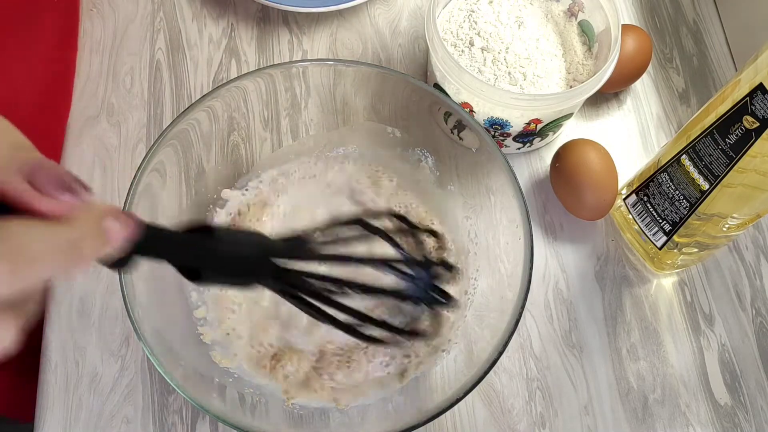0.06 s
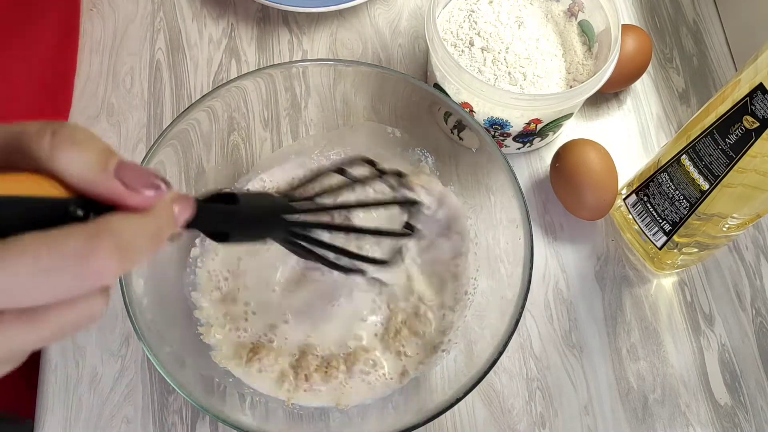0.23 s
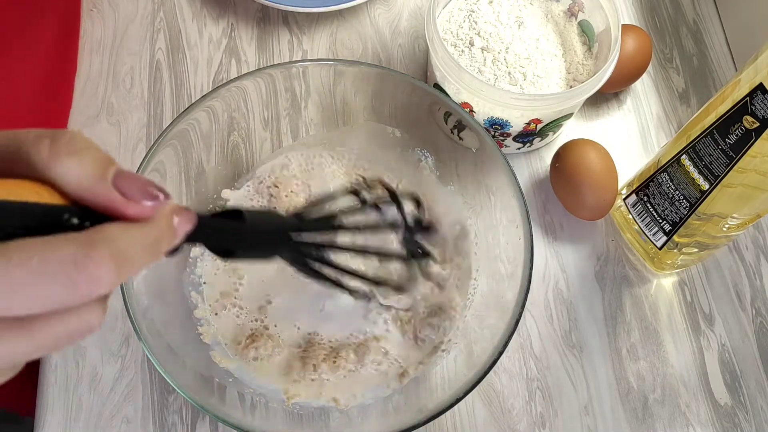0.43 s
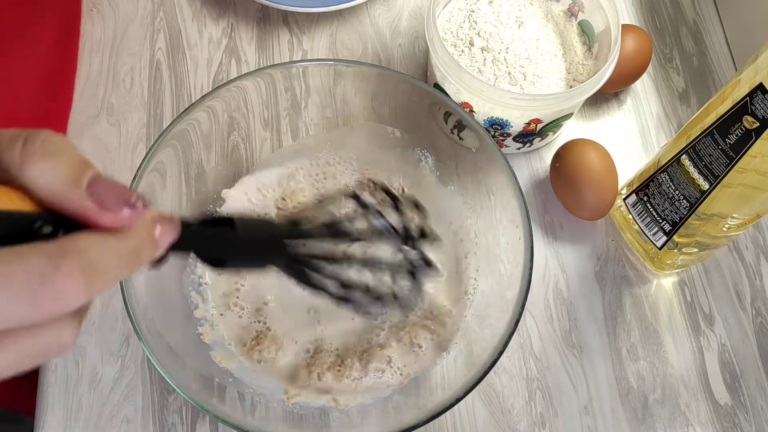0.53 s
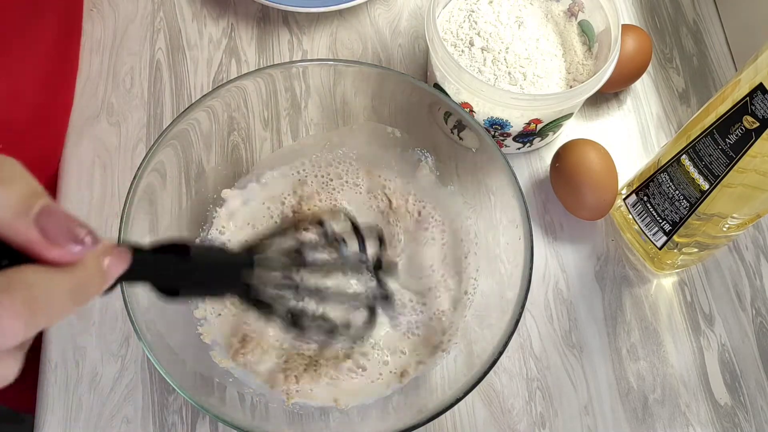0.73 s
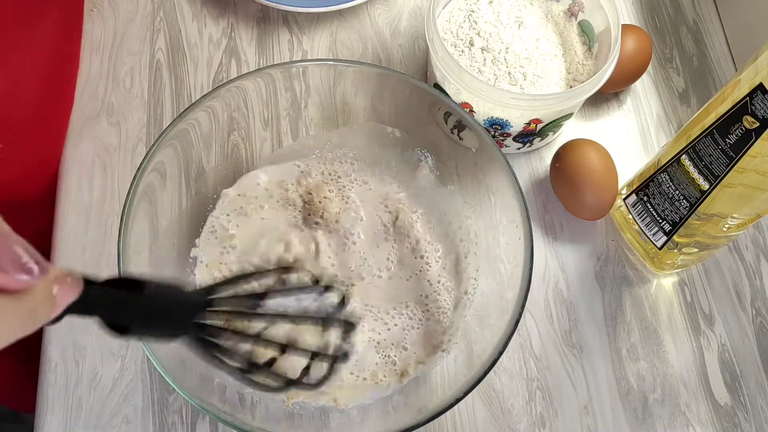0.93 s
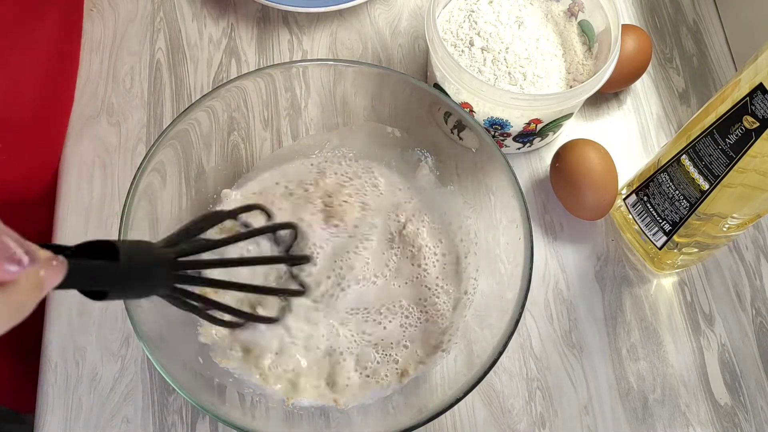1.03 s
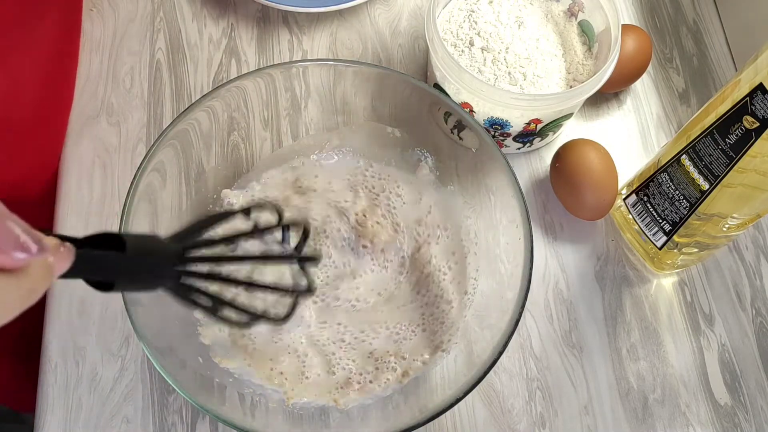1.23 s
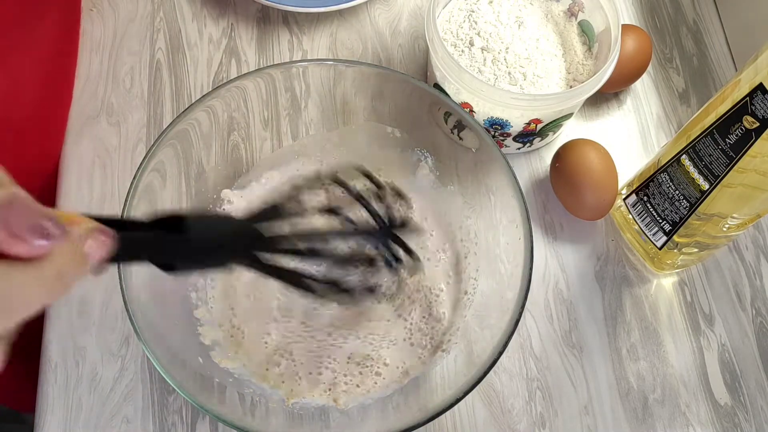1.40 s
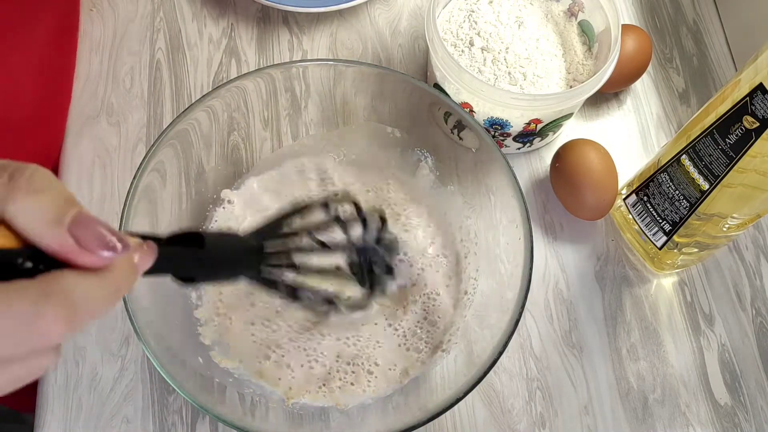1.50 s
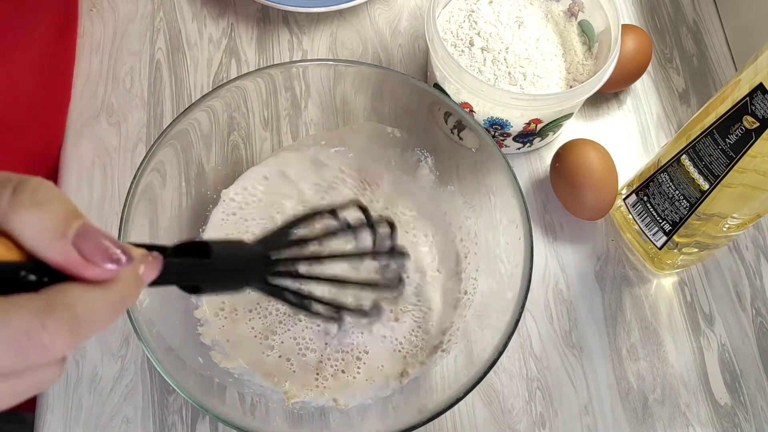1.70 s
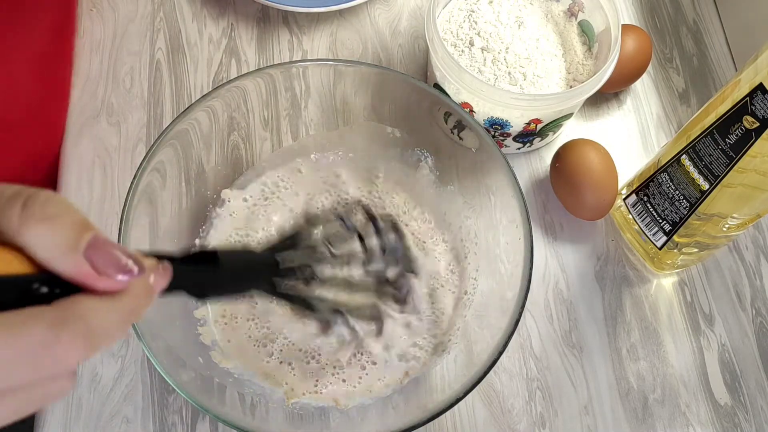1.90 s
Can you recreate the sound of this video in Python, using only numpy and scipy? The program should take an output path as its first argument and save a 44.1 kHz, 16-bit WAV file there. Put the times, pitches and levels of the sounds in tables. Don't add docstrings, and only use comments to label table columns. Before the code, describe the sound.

Whisk wires slap and clink against a glass bowl, about six quick strokes a second

```python
import sys
import numpy as np
from scipy import signal
from scipy.io import wavfile
from scipy.ndimage import uniform_filter1d

SR = 44100
rng = np.random.default_rng(int(sys.argv[2]) if len(sys.argv) > 2 else 0)


def wrap_up_sound(samples):
    columns = np.atleast_2d(samples).T
    tamed = np.clip(columns, -1, 1)
    steps = np.round(tamed * 32767).astype(np.int16)
    wavfile.write(sys.argv[1], SR, steps)


def gain_from_db(level_db):
    decades = np.asarray(level_db, float) / 20
    return 10 ** decades


N = 85995
TIME = np.arange(N) / SR

# start in seconds, levels in dB of the crack, the table thump,
# the lower bowl tone and the upper bowl tone.
STROKES = [(0.2117, -14.5, -34.5, -51, -47), (.2405, -26, -48, -41.5, -45), (0.2586, -21, -49, -43.5, -79),
           (0.4423, -11.5, -30, -35, -33), (0.632, -14, -29, -21, -31), (0.8045, -6.5, -27.5, -56, -36),
           (.972, -6, -33, -47, -34.5), (1.125, -8, -32, -46, -42), (1.284, -10.5, -34.5, -46, -45.5),
           (1.521, -14.5, -33.5, -39.5, -51), (1.5762, -26.5, -51, -34.5, -46.5)]
# pitch in Hz, level in dB under the crack,
# time the wires take to land in seconds, level of the deep bowl tone in dB.
WIRE_LOOPS = [(3400, -24, 0.0015, -0.5), (2940, -7, 0.00074, -16), (3400, -2.5, 0.0002, -21),
              (1930, -32, 0.0014, 4), (4950, -3, 0.0034, -0.5), (3260, -23, 0.0029, -11),
              (4740, -34, 0.00093, 3.5), (3140, -17, 0.0034, 1), (3750, -1, 0.00082, 1.5),
              (3500, -11.5, 0.0027, -1.3), (3530, -32, 0.0016, -6)]
STROKE_S = np.array(STROKES)[:, 0]
LIGHT_LAG = 1


def rms_one(x):
    return x / np.sqrt(np.mean(x ** 2) + 1e-20)


def at_hz(points, hz):
    table_hz, values = np.array(points).T
    return np.interp(np.log(hz), np.log(table_hz), values)


def band_pass(low_hz, high_hz):
    return signal.butter(2, [low_hz, high_hz], "band", fs=SR, output="sos")


def bands(low_hz, count):
    edges = np.geomspace(low_hz, 18000, count + 1)
    return [(np.sqrt(a * b), band_pass(a, b)) for a, b in zip(edges, edges[1:])]


def drift(rate_hz):
    r = np.exp(-80 * np.pi * rate_hz / SR)
    noise = rng.standard_normal(N // 40 + 2002)
    slow = signal.lfilter([1], [1, -2 * r, r * r], noise)[2000:]
    return np.interp(np.arange(N) / 40, np.arange(len(slow)), rms_one(slow))


def ring(clicks, hz, t60):
    r, w = gain_from_db(-60 / (t60 * SR)), 2 * np.pi * hz / SR
    return signal.lfilter([0, np.sin(w)], [1, -2 * r * np.cos(w), r * r], clicks + 1e-18)


def delay_left(x, lag):
    return np.array([x[0][np.maximum(np.arange(N) - lag, 0)], x[1]])


def floor():
    # frequency in Hz, density in dB per Hz.
    floor_colour = [(15, -2), (25, 5), (126, 1.5), (458, -11), (1210, -18), (1380, -15.5), (6240, -20.5),
                    (8400, -23.5), (15600, -30)]
    # frequency in Hz, left-right likeness as a share.
    likeness = [(60, 0.45), (180, 0.92), (550, 0.31), (1650, -0.44), (4970, 0.059), (15000, -0.18)]
    out, white = 0, rng.standard_normal((2, 2, N))
    for k, (hz, sos) in enumerate(bands(19.2, count=20)):
        mid, side = signal.sosfilt(sos, white[k % 2])
        alike = np.clip(at_hz(likeness, hz), -1, 1)
        pair = np.sqrt(1 + alike) * mid + np.sqrt(1 - alike) * side * [[1], [-1]]
        out = out + gain_from_db(at_hz(floor_colour, hz) + 1.52 * drift(3.6)) * pair
    top_cut = signal.cheby2(8, 30, 16400, fs=SR, output="sos")
    return signal.sosfilt(top_cut, gain_from_db(-47.5) * rms_one(out))


def kitchen(x):
    # frequency in Hz, decay time t60 in seconds.
    room_t60 = [(200, 0.56), (560, 0.43), (1470, 0.28), (3880, 0.21), (10200, 0.15)]
    room_db, rise_s, echo_s, echo_db = -5.5, 0.0014, 0.0082, -12.5
    t = np.arange(SR // 2) / SR
    white = rng.standard_normal((2, 2, len(t)))
    tail = 0
    for k, (hz, sos) in enumerate(bands(163.7, count=14)):
        tail = tail + signal.sosfilt(sos, white[k % 2]) * gain_from_db(-60 * t / at_hz(room_t60, hz))
    tail = tail * (1 - np.exp(-(t / rise_s) ** 2))
    tail = gain_from_db(room_db) * tail / np.sqrt(np.sum(tail ** 2) / 2)
    tail[:, int(echo_s * SR)] += gain_from_db(echo_db)
    return signal.fftconvolve(x, tail, axes=1)[:, :N]


def slosh():
    # time in seconds, level in dB.
    stir = [(0.0, -61), (0.298, -49), (0.374, -53), (0.738, -56.5), (1.012, -56.5), (1.156, -44.5),
            (1.314, -65), (1.824, -60.5), (1.95, -77)]
    bubbles_per_s, bubble_cycles, bubbles_db, lap_db = 180, 2.3, -11, -1.5
    stir_s, stir_db = np.transpose(stir)
    vigour = gain_from_db(np.interp(TIME, stir_s, stir_db))
    sizes = gain_from_db(4.9 * np.minimum(rng.exponential(1, N), 4)) * rng.choice([-1, 1], N)
    born = rng.random(N) < bubbles_per_s * gain_from_db(5 * drift(8)) / SR
    dealt, side = rng.integers(0, 16, N), rng.uniform(0.076, 1, (2, N))
    pops = 0
    for k, hz in enumerate(np.geomspace(400, 6000, 16)):
        pops = pops + ring(side * sizes * born * (dealt == k), hz, bubble_cycles / hz)
    pops = rms_one(signal.lfilter([1], [1, -0.8], pops))
    lap = ring(rng.standard_normal(N), 105, 0.063) + 0.3 * ring(rng.standard_normal(N), 212, 0.047)
    return vigour * (gain_from_db(bubbles_db) * pops + gain_from_db(lap_db + 4.1 * drift(3.0)) * rms_one(lap))


def rustle():
    # time in seconds, level in dB, centre in Hz, length in seconds.
    rustles = [(0.42, -52.5, 4560, 0.0078), (.556, -50.5, 3000, 0.0054), (0.934, -50.5, 1720, 0.0091),
               (1.094, -47, 1410, 0.019), (1.485, -51, 4500, 0.0086), (1.648, -52, 3000, 0.013),
               (1.77, -56.5, 2480, .03), (1.887, -51.5, 2190, .03), (1.008, -42.5, 3630, 0.028),
               (1.158, -41.5, 3520, 0.026)]
    out = 0
    grains = rng.standard_normal((2, N)) * rng.standard_normal((2, N)) ** 2
    for s, db, hz, length in rustles:
        octave = signal.sosfilt(band_pass(hz / np.sqrt(2), hz * np.sqrt(2)), grains + grains[0])
        out = out + gain_from_db(db) * rms_one(octave) * np.exp(-((TIME - s) / length) ** 2)
    return out


def ticks():
    # start in seconds, peak in dB, pitch in Hz, length in cycles.
    light_ticks = [(0.159, -36.5, 6530, 13), (0.1638, -27, 3370, 4.5), (0.2597, -14.5, 3400, 9.7),
                   (0.4122, -46, 5270, 25), (0.5537, -41.5, 997, 16.5), (.7224, -36, 4400, 4.5),
                   (0.259, -31, 7900, 10), (.787, -46.5, 3140, 31), (0.798, -37, 3020, 13),
                   (0.928, -42, 1650, 4.3), (1.0878, -37.5, 3240, 14), (1.3663, -38.5, 6300, 30),
                   (1.4492, -39.5, 8000, 5.4), (1.4746, -41.5, 3400, 7.4), (1.4807, -48.5, 5100, 33),
                   (1.6379, -29, 3780, 2.8), (1.577, -25.5, 890, 6.5), (1.7079, -37, 1320, 5.7),
                   (1.716, -33.5, 3750, 4.5), (1.7644, -32, 4100, 1.7), (1.604, -36, 840, 26),
                   (1.855, -34.5, 2360, 3.6), (1.8712, -31.5, 3224, 31), (1.8994, -44.5, 3200, 24),
                   (1.94, -41, 2160, 12)]
    tick_db, snap_db, roughness = 3.5, -14.5, 0.33
    out, t = np.zeros((2, N + SR)), np.arange(1800) / SR
    for s, db, hz, cycles in light_ticks:
        noise = rng.standard_normal((3, 1800))
        grain = 1 + roughness * rms_one(uniform_filter1d(noise[2], size=int(3 * SR / hz)))
        tone = np.sin(2 * np.pi * hz * t) * gain_from_db(-30 * t * hz / cycles) * grain * np.tanh(t * hz)
        snap_band = band_pass(hz / 4.6, min(hz * 1.8, 10000))
        snap = signal.sosfilt(snap_band, noise[:2] * np.exp(-t / 0.0022))
        start = int(s * SR)
        out[:, start:start + 1800] += gain_from_db(db + tick_db) * (tone + gain_from_db(snap_db) * 2 * snap)
    return delay_left(out[:, :N], LIGHT_LAG)


def lingering():
    # start in seconds, peak in dB, pitch in Hz, decay time t60 in seconds.
    tones = [(.2130, -37, 2065, 0.11), (.2410, -27, 3050, 0.021), (.2432, -31.5, 2545, 0.043),
             (.2520, -26.5, 2980, 0.036), (.2990, -41, 1920, 0.046), (.3050, -45, 3400, 0.028),
             (.4440, -32.5, 2045, 0.082), (.4430, -22, 4150, 0.024), (.5900, -47, 987, 0.035),
             (.6330, -20, 3315, 0.02), (.6340, -32, 4830, 0.086), (.8070, -27.5, 1314, 0.14),
             (.8120, -31, 895, 0.14), (.8070, -30.5, 1459, 0.11), (.8100, -38.5, 2176, 0.16),
             (.8050, -21.5, 3150, 0.031), (.8060, -32.5, 4800, 0.027), (.9810, -31, 4790, .05),
             (.9800, -36, 3130, .07), (.9830, -32, 1397, 0.12), (1.0280, -38.5, 836, 0.054),
             (1.1260, -23, 1290, 0.079), (1.1300, -26.5, 1143, 0.065), (1.1230, -23.5, 5640, 0.028),
             (1.1330, -23.5, 8530, 0.011), (1.1550, -36, 2696, 0.065), (1.1630, -34, 1265, .08),
             (1.1400, -39.5, 834, 0.22), (1.2845, -22, 3830, 0.021), (1.2845, -17.5, 6030, 0.027),
             (1.2880, -35.5, 3560, 0.1), (1.3000, -41.5, 3835, 0.25), (1.2850, -30, 1150, 0.031),
             (1.2980, -38, 823, 0.19), (1.2930, -42.5, 6288, 0.13), (1.5220, -37, 1410, 0.034),
             (1.6380, -39.5, 1130, 0.044), (1.6650, -45, 1440, 0.036), (1.7170, -47.5, 1290, 0.048),
             (1.7390, -49, 2970, 0.027), (1.7600, -44.5, 3130, .02), (1.8104, -45, 2900, .03),
             (1.8110, -49, 1450, 0.027), (.9740, -27.5, 430, 0.095), (1.1270, -33, 406.5, 0.23),
             (1.1320, -34.5, 507.6, 0.11)]
    roughness, rise_s = 0.78, 0.0011
    out, t = np.zeros((2, N + SR)), np.arange(8000) / SR
    for s, db, hz, t60 in tones:
        noise = rng.standard_normal((3, 8000))
        smooth = uniform_filter1d(noise[0] + noise[1:], size=80)
        flutter = rms_one(uniform_filter1d(smooth, size=80))
        tone = np.sin(2 * np.pi * hz * t) * gain_from_db(db - 60 * t / t60) * np.tanh(t / rise_s)
        start = int(s * SR)
        out[:, start:start + 8000] += tone * (1 + roughness * np.tanh(hz / 1800) * flutter)
    return delay_left(out[:, :N], LIGHT_LAG)


def struck(modes, column, gain_db):
    rebound, rebound_s, chance_db = 0.43, 0.006, 2.5
    out, rows = np.zeros((2, N)), np.array(STROKES)
    chance = rng.standard_normal((len(rows), len(modes), 3))
    for k, (hz, level_db, t60, *pan_db) in enumerate(modes):
        clicks = np.zeros((2, N))
        for late in (0, 1):
            wait = late * rebound_s * (1 + 0.321 * np.tanh(chance[:, k, 2]))
            at = ((STROKE_S + wait) * SR).astype(int)
            clicks[late, at] = gain_from_db(rows[:, column] + gain_db + level_db + chance_db * chance[:, k, late])
        tone = ring(clicks[0] + rebound * clicks[1], hz, t60)
        if pan_db:
            tone = (-1) ** k * tone
            turn = int(SR / hz * min(hz / 5000, 0.25))
            out += np.array([tone, np.roll(tone, turn)]) * gain_from_db([[pan_db[0] / 2], [-pan_db[0] / 2]])
        else:
            out += tone * gain_from_db([[1.3], [-1.3]])
    push = np.hanning(41)[::2] ** 2
    return signal.lfilter(push / push.sum(), 1, out)


def table_thump():
    # frequency in Hz, level in dB, decay time t60 in seconds.
    table_modes = [(114.3, -12, 0.49), (131.2, -3, 0.1), (136, -12, 0.13), (221, -6, 0.08),
                   (290, -10, 0.054)]
    low_cut = signal.butter(2, 137, "high", fs=SR, output="sos")
    return signal.sosfilt(low_cut, struck(table_modes, column=2, gain_db=5.5))


def bowl_ring():
    # frequency in Hz, level in dB, decay time t60 in seconds, left-right difference in dB.
    deep_modes = [(373.6, -12.5, 0.32, -1), (401.7, -7, 0.035, 5.5), (502.6, -14.5, 0.12, 6.5)]
    low_modes = [(806, 2, .09, 6), (834, 1, .09, 5)]
    high_modes = [(1129, -1, 0.081, -1.3), (1296, 2, 0.16, 1.8), (1412, -1.5, 0.061, 1.8),
                  (1540, -11, 0.11, 1.3), (1935, -8, 0.048, -1.5)]
    deep = struck(deep_modes, column=2, gain_db=5.5 + np.array(WIRE_LOOPS)[:, 3])
    low = struck(low_modes, column=3, gain_db=-1.5)
    return deep + low + struck(high_modes, column=4, gain_db=-1.5)


def cracks():
    spread_s = [0.0048, 0.031, 0.0023, 0.0035, 0.0042, 0.0044, 0.0069, 0.0033, 0.0017, 0.0059, 0.00079]
    left_lag = [5, 1, 0, 4, 6, 4, 5, 7, 7, 5, 8]
    # frequency in Hz, density in dB per Hz.
    crack_colour = [(290, 26.5), (500, -9), (3290, 3.5), (4470, 7.5), (5880, 0.5), (6700, -8), (8450, -2),
                    (10500, -22), (16000, -13.5)]
    # wire colour in dB near 3.3, 5.5, 8.3 and 13 kHz.
    wire_colour = [(6.5, -14, -2.5, -35), (-6, -8.5, -3, 6), (8.5, -23, 14, -8), (2.5, -3, 5, -1),
                   (3.5, -8, 4, 2), (-9.5, -7, -7, -2.5), (-1, -3.5, 3.5, 6), (-3, -2, 7, 6.5),
                   (0, -8.5, 14, 3), (-6, -7.5, 0, -3), (3.5, -27, 2.2, 2)]
    colour_hz = [1500, 3300, 5500, 8300, 13000]
    clicks_per_s, crack_db, chance_db, alike = 9000, -4.5, 1.5, 0.46
    rise_s, first_wire_db, loop_t60_s = 0.0007, 9, 0.022

    chance = rng.standard_normal((len(STROKES), 24))
    spray = rng.standard_normal((3, N)) * (rng.random((3, N)) < clicks_per_s / SR)
    spray = np.sqrt(alike) * spray[0] + np.sqrt(1 - alike) * spray[1:]
    spray[:, ((STROKE_S + rise_s) * SR).astype(int) + 1] = gain_from_db(first_wire_db)

    shapes = []
    for start, spread, loop in zip(STROKE_S, spread_s, WIRE_LOOPS):
        since = TIME - rise_s - start
        width = np.where(since < 0, loop[2], spread)
        shapes.append(np.exp(-np.clip(since / width, -5, 5) ** 2))
    shapes = np.array(shapes)

    level_db, out = np.array(STROKES)[:, 1] + crack_db, 0
    for k, (hz, sos) in enumerate(bands(378.3, count=16)):
        own_db = np.array([np.interp(np.log(hz), np.log(colour_hz), (0, *row)) for row in wire_colour])
        db = level_db + at_hz(crack_colour, hz) + own_db + chance_db * chance[:, k]
        out = out + (-1) ** k * signal.sosfilt(sos, spray * (gain_from_db(db) @ shapes) + 1e-18)
    for shape, db, loop in zip(shapes, level_db, WIRE_LOOPS):
        out = out + gain_from_db(db + loop[1] - 19) * ring(spray * shape, loop[0], loop_t60_s)
    stroke = np.maximum(np.searchsorted(STROKE_S - 0.008, TIME) - 1, 0)
    return delay_left(out, np.array(left_lag)[stroke])


def scene():
    near, light, bowl = cracks(), ticks() + slosh(), bowl_ring()
    room = kitchen(near + 0.4 * light + 0.18 * bowl)
    return near + light + bowl + table_thump() + room + floor() + lingering() + rustle()


def band_limit(x):
    return signal.sosfilt(signal.butter(12, 17160, fs=SR, output="sos"), x)


def record(dry):
    lifted = dry + signal.lfilter(*signal.iirpeak(8400, 8400 / 1490, fs=SR), dry)
    top_cut = signal.cheby2(10, 60, 17150, fs=SR, output="sos")
    return band_limit(signal.sosfilt(top_cut, lifted))


dry = scene()
out = record(dry)
wrap_up_sound(out)
```